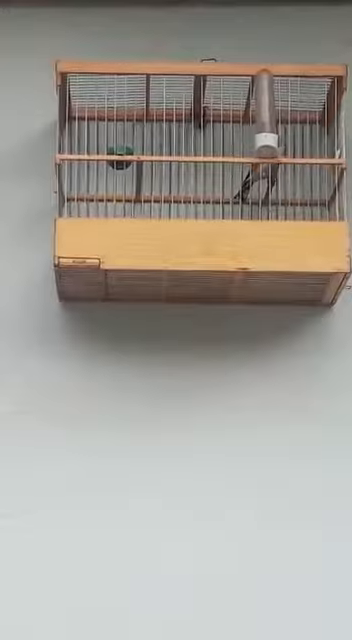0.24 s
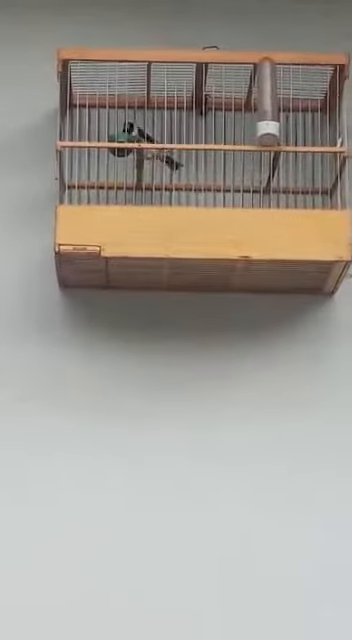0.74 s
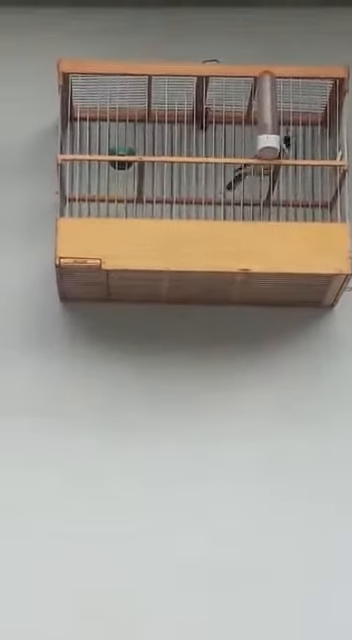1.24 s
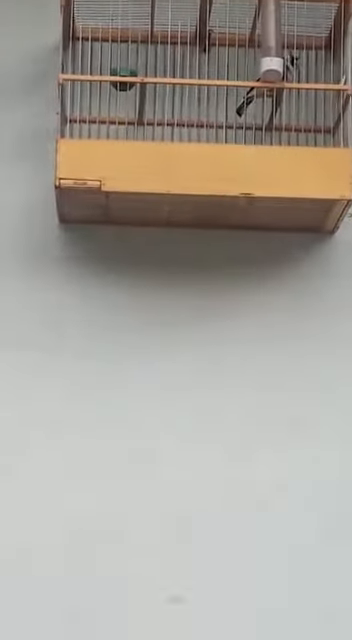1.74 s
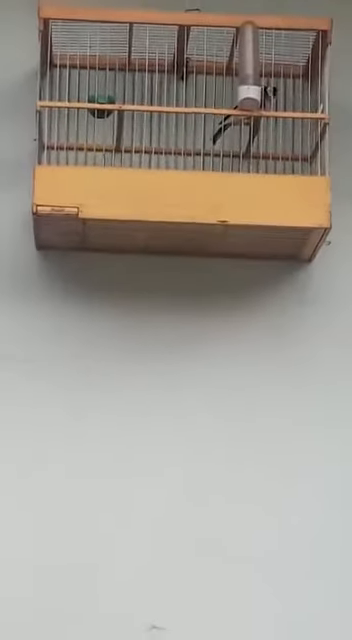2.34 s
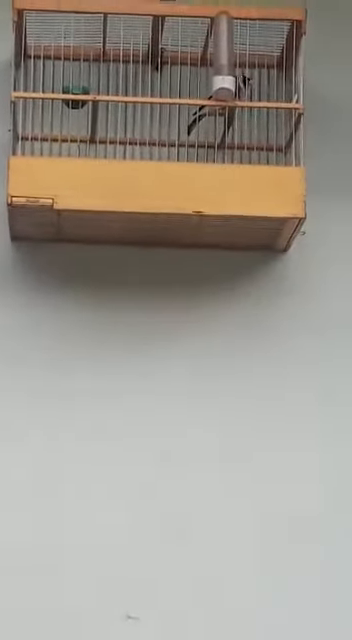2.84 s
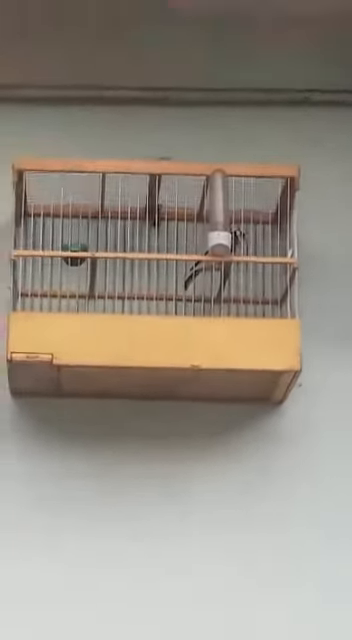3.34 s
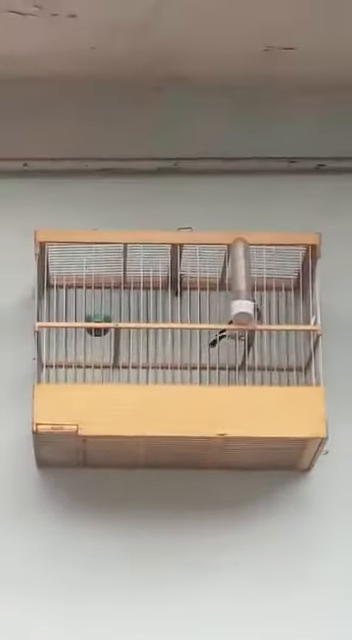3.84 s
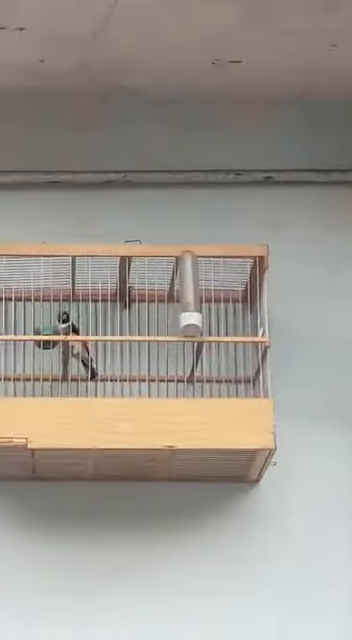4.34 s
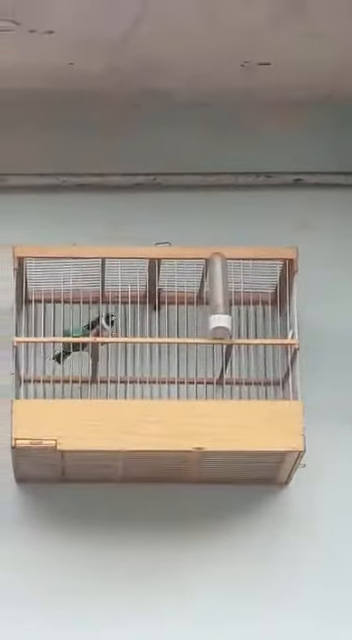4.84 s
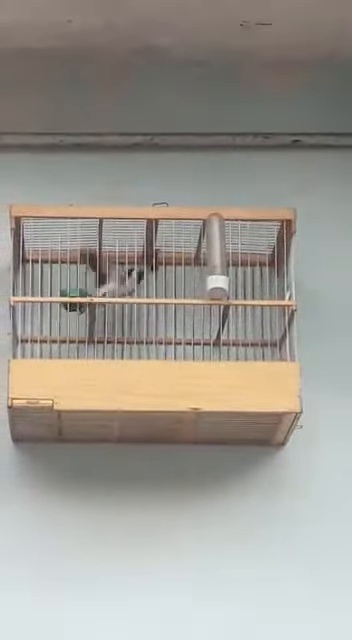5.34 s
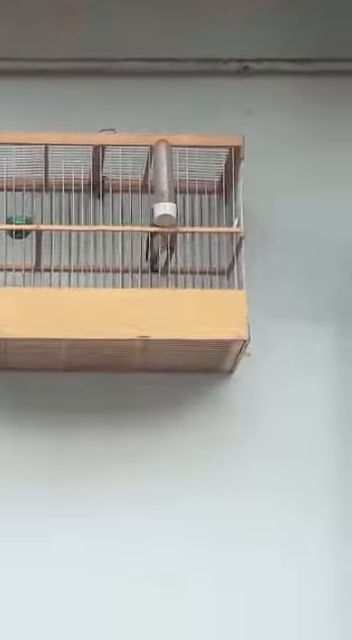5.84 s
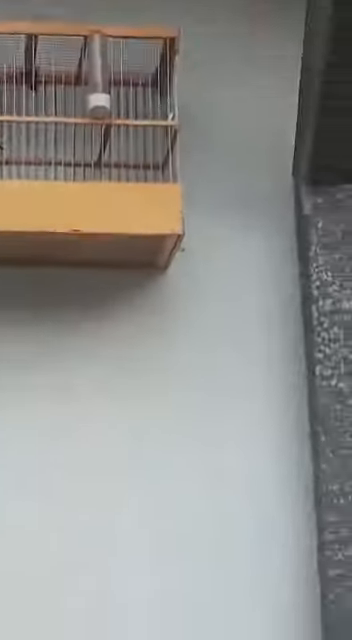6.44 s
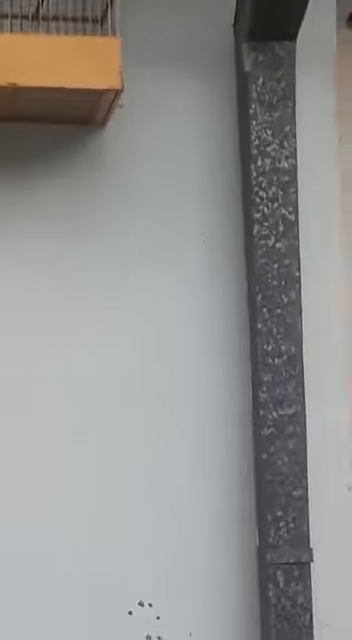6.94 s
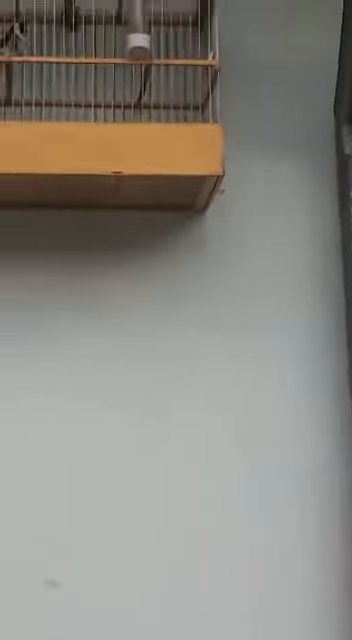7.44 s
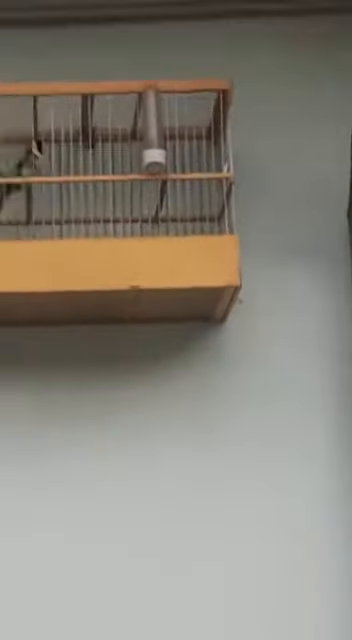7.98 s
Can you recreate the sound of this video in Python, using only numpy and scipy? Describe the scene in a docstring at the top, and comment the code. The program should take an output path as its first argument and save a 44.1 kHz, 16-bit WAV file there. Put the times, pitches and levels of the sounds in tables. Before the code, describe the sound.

A small bird in a cage sings quick bouts of high trills with pauses, over quiet outdoor air, distant chirps and soft cooing.

```python
"""A goldfinch sings in a cage on a house wall: trills of falling sweeps, rising chips, a closing flourish.
Each note is a few gliding whistles from its syrinx, scattered by the bars and echoed by wall and yard.
Behind it, over a bed of quiet air, a dove repeats a five-note coo, faint tones carry from the street
and other small birds chirp. The finch flutters once across its cage, ringing the wood and wire;
a soft bump on the phone is followed by a faint hiss."""
import sys
import numpy as np
from scipy import signal
from scipy.fft import rfft, irfft, next_fast_len
from scipy.io import wavfile

SR = 44100
rng = np.random.default_rng(int(sys.argv[2]) if len(sys.argv) > 2 else 0)


def digitize_waveform(pressure):
    """Quantize a signal to 16-bit integers and store it at the path in sys.argv[1].

    Rows of a 2-D input are taken as channels; values are limited to [-1, 1].
    """
    field = np.atleast_2d(pressure).T
    bounded = np.clip(field, -1, 1)
    quanta = np.round(bounded * 32767).astype(np.int16)
    wavfile.write(sys.argv[1], SR, quanta)


N = 362061
T = np.arange(N) / SR

# the finch's syllables as gliding strokes; overlapping ones come from the two sides of the syrinx:
# (delay [s], length [s], from [Hz], to [Hz], bend [exponent], swell [s], hold [s], level [dB])
FINCH_SYLLABLES = { "tew": [(0, .02, 7800, 5700, 4.7, .007, 0.0048, -7.5),
                   (.002, 0.014, 5500, 9360, 1, 0.012, .007, -2.5),
                   (.009, 0.036, 8900, 5270, 4.74, 0.017, .013, -0.5),
                   (.02, .024, 5400, 3124, 0.68, 0.013, 0.0096, 1),
                   (.032, .046, 5310, 2780, 1.88, 0.0073, 0.022, -1),
                   (.06, 0.06, 3085, 2370, 2.52, .01, 0.018, -10)],
                   "tsiu": [(-.003, 0.0211, 7940, 6140, 2.87, 0.0053, 0.013, -7.5),
                   (0, .017, 6540, 9310, 1, 0.0049, 0.0082, -3.5),
                   (.012, .034, 8600, 5695, 3.2, 0.0097, 0.012, -1.5),
                   (.021, .045, 5900, 4150, 2.2, .007, .031, -3),
                   (.049, .032, 4864, 2300, .9, 0.0077, 0.012, -1.5)],
                   "low chip": [(0, 0.031, 2150, 3490, 3.7, 0.01, 0.012, 1.5)],
                   "high chip": [(0, 0.0261, 4300, 5120, 2.12, 0.0093, 0.0065, -0.5),
                   (.002, 0.029, 5760, 6475, 2, 0.0072, 0.0072, -21)],
                   "rising chip": [(0, .022, 2673, 3637, 0.998, 0.0052, 0.018, -13.5),
                   (.01, 0.0231, 3170, 4456, 2.99, 0.0052, 0.0091, -3)],
                   "ting": [(0, 0.068, 4920, 5433, 8, 0.0093, 0.031, -2),
                   (.005, .038, 6260, 6690, 3.5, 0.0072, .021, -2.5)],
                   "see": [(0.0017, 0.039, 6850, 6760, 0.37, 0.011, 0.011, 0)],
                   "chu": [(0, .056, 6683, 3270, 1.2, 0.0052, 0.035, 0.5),
                   (.01, .03, 9260, 5130, 0.71, 0.017, 0.0078, -12)],
                   "wit": [(-.003, .028, 2300, 3699, 1, 0.0026, 0.018, -14.5),
                   (.013, .036, 3470, 4372, 1.8, 0.013, 0.0038, 0.5)],
                   "slide": [(0, .11, 5660, 3784, 1.75, 0.024, 0.017, -1),
                   (.07, 0.13, 4260, 3164, 2.9, .015, 0.091, -14.5)],
                   "zip": [(0.00076, .032, 4600, 7850, 2.2, 0.005, 0.01, 0)],
                   "whee": [(0, .03, 2976, 5230, 1, 0.015, 0.0084, -7),
                   (.015, .047, 5086, 5380, 6.4, 0.0079, 0.019, -2),
                   (.06, .085, 5350, 5310, 1, .025, .012, -11.5)],
                   "chew": [(0, 0.0418, 6220, 3940, .8, .015, 0.0065, -4.5),
                   (.016, .06, 5400, 2660, 1.7, 0.006, 0.018, 1),
                   (.06, .085, 3020, 1544, 1.6, 0.0095, 0.029, -14)], }
# the finch's single notes: (time [s], syllable, level [dB], pitch [factor])
FINCH_NOTES = [ (-.038, "tew", -18, 1.03), (1.155, "low chip", -15.5, 1.016),
               (1.263, "high chip", -11.5, 1.007), (1.388, "rising chip", -8.5, 1.006),
               (3.642, "low chip", -17.5, 1.01), (3.743, "high chip", -12, 1.017),
               (3.849, "rising chip", -7, 1.006), (4.054, "low chip", -16.5, 1.03),
               (4.173, "high chip", -13, 1.002), (6.84, "ting", -21.5, 1.02), (6.988, "see", -21, 1.004),
               (7.029, "chu", -15.5, 1.006), (7.101, "wit", -13.5, 1.08), (7.173, "slide", -6, 1.017),
               (7.45, "zip", -16, 1.0), (7.502, "low chip", -24.5, .94), (7.548, "whee", -8, 1.0),
               (7.729, "see", -19, 0.99), (7.771, "chu", -16.5, 1.033), (7.846, "wit", -14, 1.036),
               (7.917, "chew", -12.5, 0.99), ]
# trills on one syllable:
# (start [s], end [s], period [s], syllable, first [dB], middle [dB], last [dB], pitch [factor])
FINCH_TRILLS = [(0.092, .6, 0.1474, "tew", -18.5, -19.5, -20.5, 0.99),
                (4.704, 5.72, 0.12, "tsiu", -25.5, -18, -18.5, 0.98),
                (5.792, 6.1, .1223, "tsiu", -20, -20.5, -22, 0.94)]
# EQ on the finch's voice: (frequency [Hz], gain [dB])
FINCH_EQ = [(1600, -13), (2500, -8), (3300, -4), (4400, -1), (7000, 1), (8500, -6), (9600, -25),
            (10800, -18), (12000, -19.5), (15500, -20.5)]
# early reflections off the wall, the cage roof and the eaves: (delay [ms], gain [factor])
WALL_ECHOES = [(1.3, 0.033), (4.1, 0.31), (8.7, 0.22), (13.4, 0.22), (41, 0.093), (56, 0.04)]
# distant house fronts return only the low end of the song: (frequency [Hz], gain [dB])
HOUSE_FRONT_EQ = [(1900, 3.5), (2600, -25.5), (4000, -26), (8000, -39)]
# tone of the outdoor air: (frequency [Hz], relative level [dB])
AIR_SPECTRUM = [(20, -38.5), (40, -14.5), (60, -10.5), (100, -5), (145, -2), (185, -17), (260, -14.5),
                (450, -10), (700, -12), (1000, -11.5), (1400, -14.5), (2200, -5.5), (3000, -13.5),
                (4300, -9), (6500, -12.5), (8300, -19.5), (9500, -40.5), (15500, -36)]
# the dove's five coos: (delay [s], rise [s], fall [s], top before detuning [Hz], level [dB])
DOVE_COOS = [(.07, .075, 0.045, 703, 2), (.275, 0.074, 0.076, 780.5, 1.5), (.48, .05, 0.12, 779, 1.5),
             (.65, 0.0495, .085, 778, 2), (.785, 0.036, .135, 686, 1)]
# the dove's phrases: (time [s], level [dB], coo spacing [factor])
DOVE_PHRASES = [(.1, -47, 0.94), (1.83, -45, 0.98), (3.58, -45.5, 0.93), (5.29, -45.5, 0.93),
                (7.05, -48.5, 0.9)]
# tones from far down the street: (start [s], end [s], pitch before detuning [Hz], level [dB])
STREET_TONES = [(0.451, 0.931, 1595, -62.5), (1.0, 1.45, 1520, -64), (1.47, 1.597, 2383, -56.5),
                (1.746, 2.09, 1187, -73), (1.972, 2.034, 2250, -59), (3.694, 3.899, 362, -65),
                (4.593, 5.896, 102.7, -67.5), (6.144, 6.372, 1041, -64.5), (6.414, 6.72, 1324, -69)]
# calls of other small birds, in strokes with the same columns as FINCH_SYLLABLES
FAR_BIRD_CALLS = { "chirrup": [(0, 0.046, 7540, 5510, 0.9, .012, 0.017, -10.5),
                  (.02, .05, 5260, 4190, 1.5, 0.01, 0.015, -2),
                  (.065, .065, 4433, 5810, 1, .012, 0.0089, -5.5)],
                  "chup": [(.005, .08, 4635, 3005, 1.4, 0.016, 0.022, 2)],
                  "seep": [(0, 0.13, 6200, 6550, 1.4, 0.0078, 0.023, 0)],
                  "tsip": [(0.0043, .09, 7300, 5800, 0.67, 0.014, 0.03, 0.018)], }
# their cues: (time [s], call, level [dB], pitch [factor])
FAR_BIRD_NOTES = [(.66, "seep", -51.5, 0.96), (0.869, "chup", -55.5, 1.09), (1.018, "tsip", -58, 0.6),
                  (1.42, "seep", -45, 0.89), (1.62, "tsip", -52.5, 0.9), (1.638, "chup", -55.5, 1.05),
                  (1.833, "chirrup", -38.5, 0.99), (2.28, "chup", -51.5, 1.02),
                  (2.344, "seep", -49.5, 0.95), (2.431, "tsip", -53, 0.68), (2.558, "chirrup", -40.5, 0.98),
                  (2.759, "chup", -50, 0.95), (2.889, "tsip", -51, 0.91), (3.109, "chirrup", -43.5, 0.93),
                  (3.532, "chup", -55, 1.05), (4.487, "chirrup", -40.5, 0.99),
                  (6.359, "chirrup", -42, 0.96), (6.549, "chup", -50.5, 1.23)]
# wing beats: (time [s], level [dB])
WING_BEATS = [(5.354, -43.5), (5.412, -37), (5.467, -30.5), (5.503, -29), (5.539, -27), (5.573, -43),
              (5.61, -41.5)]
# tone of the feathers: (frequency [Hz], relative level [dB])
FEATHER_SPECTRUM = [(120, -29), (300, -4.5), (450, 8), (850, -10), (1550, 1.5), (2100, 0.5), (4000, -33),
                    (9000, -16.5), (14000, -32)]
# feet and feathers striking the cage: (time [s], level [dB])
CAGE_TAPS = [(5.356, -51), (5.538, -30.5), (5.586, -28.5), (6.724, -50)]
# resonances of the cage: (frequency [Hz], level [dB], time to fall 60 dB [s])
CAGE_MODES = [(443, 0.5, 0.016), (604, 9.5, 0.039), (1076, -2, 0.12), (1424, 10.5, 0.036),
              (1576, 13.5, 0.045), (1770, -7, .04), (2010, 13, 0.017), (2400, 1, 0.036)]
# tone of the hiss: (frequency [Hz], relative level [dB])
HISS_SPECTRUM = [(1500, -36.5), (3000, -6.5), (4200, 4), (7500, 0.5), (9500, -17), (15500, -22.5)]
# fader ride on the hiss: (time [s], level [dB])
HISS_ENVELOPE = [(6.68, -62), (6.72, -38.5), (6.85, -45), (7.0, -50), (7.4, -49.5), (8.2, -47.5)]


def undb(db):
    """Decibels to gain."""
    return 10 ** (np.asarray(db) / 20)


def add(out, start, x):
    """Mix x into out at a start time in seconds."""
    i = int(round(start * SR))
    x, i = x[max(-i, 0):], max(i, 0)
    out[i:i + len(x)] += x[:max(N - i, 0)]


def colour(x, points):
    """EQ with a curve of (frequency [Hz], gain [dB]) points."""
    hz, db = np.transpose(points)
    size = next_fast_len(len(x))
    bins = np.maximum(np.fft.rfftfreq(size, 1 / SR), 1)
    gain = undb(np.interp(np.log(bins), np.log(hz), db))
    return irfft(rfft(x, size) * gain, size)[:len(x)]


def noise(points, size=N):
    """Coloured noise of rms 1."""
    x = colour(rng.standard_normal(size), points)
    return x / np.sqrt(np.mean(x ** 2))


def wander(t, rate):
    """A random modulator with `rate` new targets a second."""
    return np.interp(t * rate, np.arange(1024), rng.standard_normal(1024))


def glide(length, from_hz, to_hz, bend, swell, hold, db, edge_db=-18):
    """One stroke swells, holds and dies as its pitch slides; a bend over 1 moves early and settles."""
    t = np.linspace(0, length, 200)
    release = max(length - swell - hold, .002)
    quiet = np.maximum(1 - t / swell, (t - length) / release + 1).clip(0, 1)
    hz = to_hz + (from_hz - to_hz) * (1 - t / length) ** bend
    return t, hz, db + edge_db * quiet


def whistle(course, pitch, waver, waver_rate, second_db, third_db, rasp=0):
    """A syrinx note: a wavering near-sine with weak overtones; rasp roughens its fast sweeps."""
    times, course_hz, db = course
    t = np.arange(int(times[-1] * SR)) / SR
    hz = np.interp(t, times, course_hz) * pitch
    sweep = np.tanh(np.abs(np.gradient(np.log2(hz), t)) / 22)  # levels off past 22 octaves a second
    hz = hz * (1 + (waver + rasp * sweep) * wander(t, waver_rate))
    phase = 2 * np.pi * np.cumsum(hz) / SR
    overtones = sum(undb(level) * np.sin(k * phase) * (k * hz < SR / 2)
                    for k, level in [(2, second_db), (3, third_db)])
    fade = np.clip(np.minimum(t, t[-1] - t) / .001, 0, 1)
    return (np.sin(phase) + overtones) * fade * undb(np.interp(t, times, db))


def cage_bars(note, share, decay):
    """The bars smear a note into a fresh random cluster of tiny echoes, keeping its energy."""
    t = T[:SR // 25]
    scatter = rng.standard_normal(len(t)) * (rng.random(len(t)) < .06) * np.exp(-t / decay)
    response = share * scatter / np.sqrt(np.sum(scatter ** 2))
    response[0] += 1  # the direct sound
    out = signal.fftconvolve(note, response)
    return out * np.sqrt(np.sum(note ** 2) / np.sum(out ** 2))


def yard(x, t60_low, t60_high, build):
    """Yard reverb: uneven reflections that thicken, with separate decay times for lows and highs."""
    t = T[:SR]
    grain = rng.standard_normal(SR) * (rng.random(SR) < .03 + t)
    lows = signal.sosfiltfilt(signal.butter(2, 5500, fs=SR, output="sos"), grain)
    highs = grain - lows
    tail = lows * undb(-60 * t / t60_low) + highs * undb(-60 * t / t60_high)
    tail *= 1 - np.exp(-t / build)
    return signal.fftconvolve(x, tail / np.sqrt(np.sum(tail ** 2)))[:N]


def finch():
    """The caged bird whistles up close, with slaps off the wall and the ring of the yard."""
    voice = np.zeros(N)
    for start, name, db, pitch in FINCH_NOTES + list(trill_notes()):
        for delay, *stroke in FINCH_SYLLABLES[name]:
            note = whistle(glide(*stroke), pitch, waver=0.0041, waver_rate=900,
                           second_db=-24, third_db=-31.5, rasp=0.0567)
            add(voice, start + delay, undb(db) * cage_bars(note, share=0.95, decay=0.012))
    voice = colour(voice, FINCH_EQ)
    near = voice.copy()
    for ms, gain in WALL_ECHOES:
        add(near, ms / 1000, gain * voice)
    late = yard(colour(voice, HOUSE_FRONT_EQ), t60_low=0.8, t60_high=0.29, build=.05)
    return near + late + undb(-5.5) * yard(voice, t60_low=0.36, t60_high=0.23, build=0.0036)


def trill_notes():
    """A trill repeats one syllable at a steady pace, its level riding a smooth curve."""
    for start, end, period, name, first_db, middle_db, last_db, pitch in FINCH_TRILLS:
        times = np.arange(start, end, period)
        curve = np.polyfit([0, .5, 1], [first_db, middle_db, last_db], 2)
        levels = np.polyval(curve, np.linspace(0, 1, len(times)))
        for time, db in zip(times, levels):
            yield time, name, db, pitch * (1 + .008 * rng.standard_normal())


def air():
    """A quiet bed of outdoor noise that swells a little."""
    swell_db = .9 * wander(T, 2.3) + .8 * wander(T, 12)
    return noise(AIR_SPECTRUM) * undb(-53.5 + swell_db)


def arch(rise, fall, top_hz, db, droop=0.31, edge_db=-11):
    """One coo: pitch and level rise to a rounded top and sink together."""
    t = np.linspace(0, rise + fall, 200)
    from_top = np.maximum(1 - t / rise, (t - rise) / fall)
    return t, top_hz * (1 - droop * from_top ** 2), db + edge_db * from_top ** 3.1


def dove():
    """A distant dove repeats its five arched coos, blurred by the house fronts."""
    voice = np.zeros(N)
    for start, db, spacing in DOVE_PHRASES:
        for delay, *coo in DOVE_COOS:
            note = whistle(arch(*coo), pitch=0.97, waver=0.015, waver_rate=163.4,
                           second_db=-20.5, third_db=-33.5, rasp=0.065)
            add(voice, start + delay * spacing, undb(db) * note)
    return undb(-4) * voice + undb(-3.5) * yard(voice, t60_low=.42, t60_high=.4, build=.006)


def street():
    """Faint held whistles and hums carry from far away, washed in reverb."""
    tones = np.zeros(N)
    for start, end, hz, db in STREET_TONES:
        course = np.linspace(0, end - start, 3), [hz, hz, hz], [db - 1, db, db - 3.5]
        tone = whistle(course, pitch=0.98, waver=0.018, waver_rate=79, second_db=-30.5, third_db=-44.5)
        add(tones, start, tone)
    return tones + 1.87 * yard(tones, t60_low=0.35, t60_high=0.35, build=0.013)


def far_birds():
    """Small birds further off with raspy voices, about half direct sound and half yard echo."""
    voice = np.zeros(N)
    for start, name, db, pitch in FAR_BIRD_NOTES:
        for delay, *stroke in FAR_BIRD_CALLS[name]:
            note = whistle(glide(*stroke), pitch, waver=0.04, waver_rate=1800,
                           second_db=-43, third_db=-36, rasp=0.15)
            add(voice, start + delay, undb(db) * note)
    # the flock beyond them twitters at random
    tsip = glide(*FAR_BIRD_CALLS["tsip"][0][1:])
    for when, loudness, height in rng.random((36, 3)):
        note = whistle(tsip, 0.6 + .55 * height, waver=.06, waver_rate=830, second_db=-40, third_db=-48)
        add(voice, when * T[-1], undb(-65.5 + 3 * loudness) * note)
    return undb(5.5) * voice + undb(5) * yard(voice, t60_low=0.34, t60_high=0.16, build=0.019)


def flutter():
    """Puffs of air from the wings, and taps that ring the wood and wire of the cage."""
    out, t = np.zeros(N), T[:SR // 6]
    puff_envelope = (1 - np.exp(-t / 0.0098)) * np.exp(-t / 0.026)
    for start, db in WING_BEATS:
        add(out, start, undb(db) * noise(FEATHER_SPECTRUM, len(t)) * puff_envelope)
    for start, db in CAGE_TAPS:
        ring = sum(undb(level - 60 * t / t60) * np.sin(2 * np.pi * hz * t + rng.uniform(0, 2 * np.pi))
                   for hz, level, t60 in CAGE_MODES)
        crack = noise(FEATHER_SPECTRUM, len(t)) * np.exp(-t / 0.0016)
        add(out, start, undb(db) * (0.27 * ring + 0.53 * crack))
    return out + undb(-6.5) * yard(out, t60_low=0.1, t60_high=0.35, build=0.0036)


def hand_bump():
    """A hand bumps the phone with a soft, low thud; a faint hiss follows and settles."""
    out, t = np.zeros(N), T[:SR // 4]
    rumble = noise([(30, -12), (100, 2), (220, -4), (400, -32), (2000, -42), (9000, -70)], len(t))
    add(out, 6.697, undb(-47.5) * rumble * np.exp(-t / 0.031))
    hiss_db = np.interp(T, *np.transpose(HISS_ENVELOPE))
    return out + noise(HISS_SPECTRUM) * undb(hiss_db)


def scene():
    """The mono mix: the finch up front, everything else well behind it."""
    return (finch() + far_birds() + street() + dove() + flutter() + hand_bump() + air())[None]


def record(dry):
    """A hard clip at full scale, then a steep high cut at 15.8 kHz."""
    high_cut = signal.ellip(10, .1, 80, 15800, fs=SR, output="sos")
    return signal.sosfilt(high_cut, np.clip(dry, -1, 1))


dry = scene()
out = record(dry)
digitize_waveform(out)
```